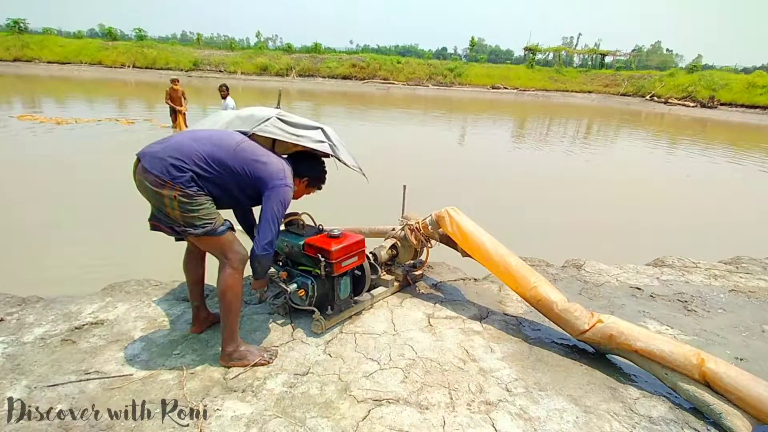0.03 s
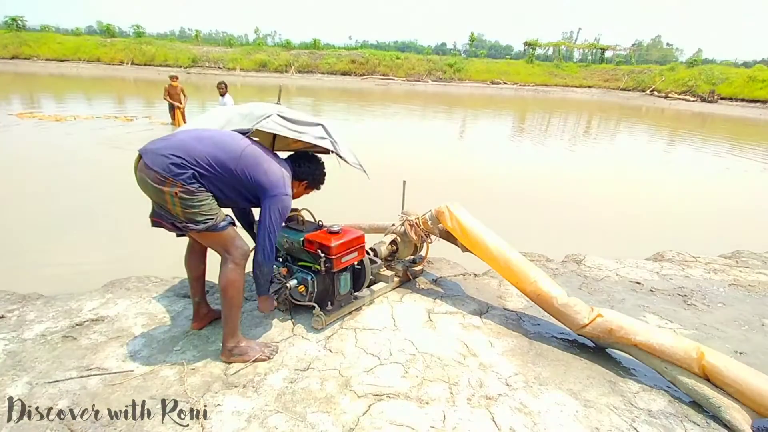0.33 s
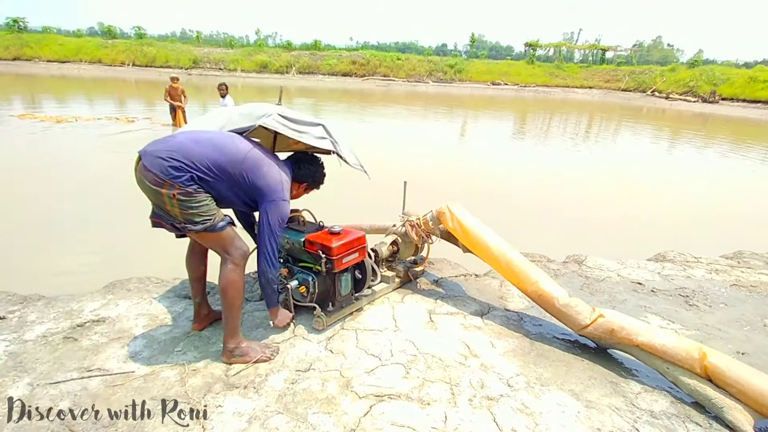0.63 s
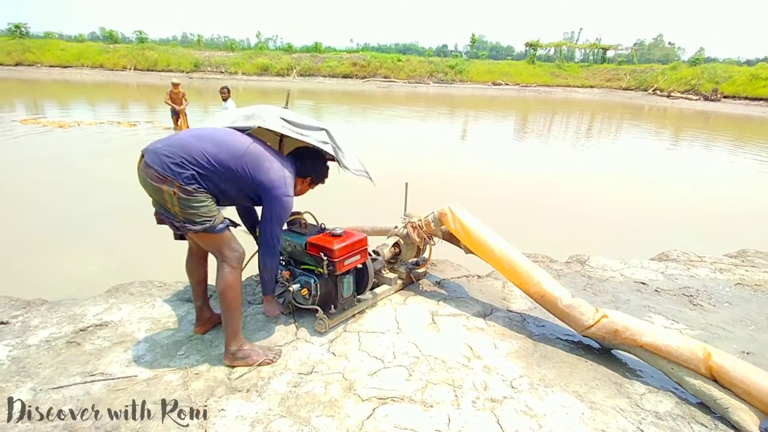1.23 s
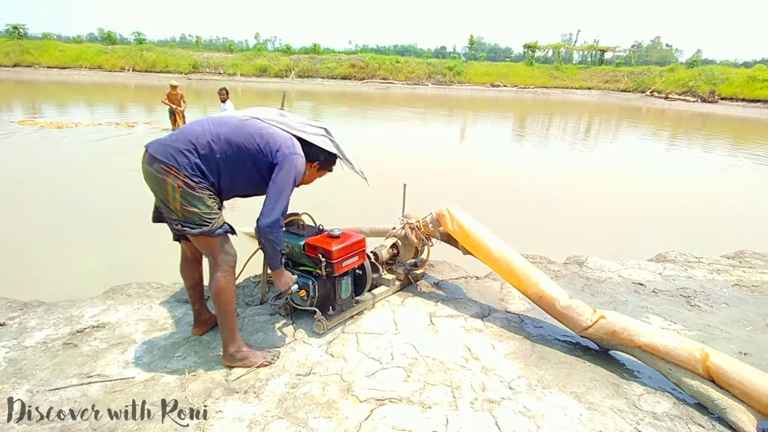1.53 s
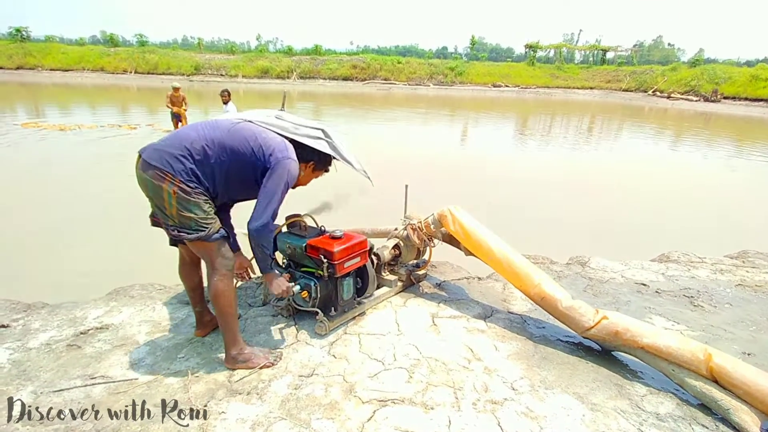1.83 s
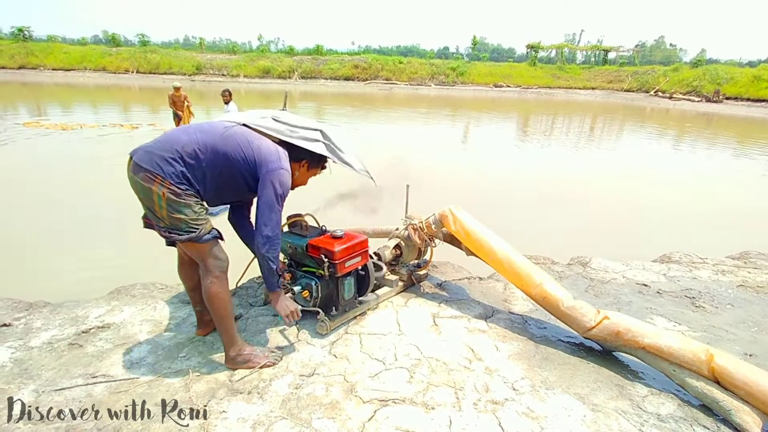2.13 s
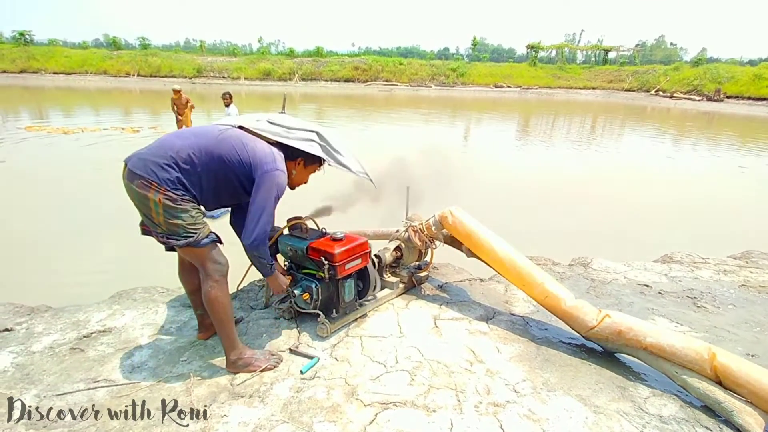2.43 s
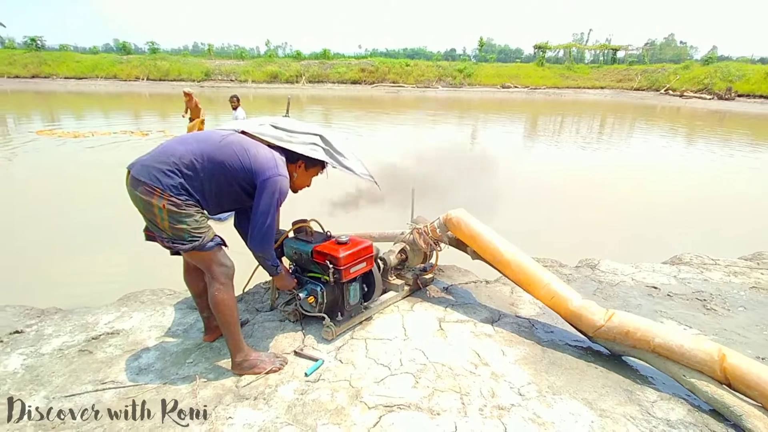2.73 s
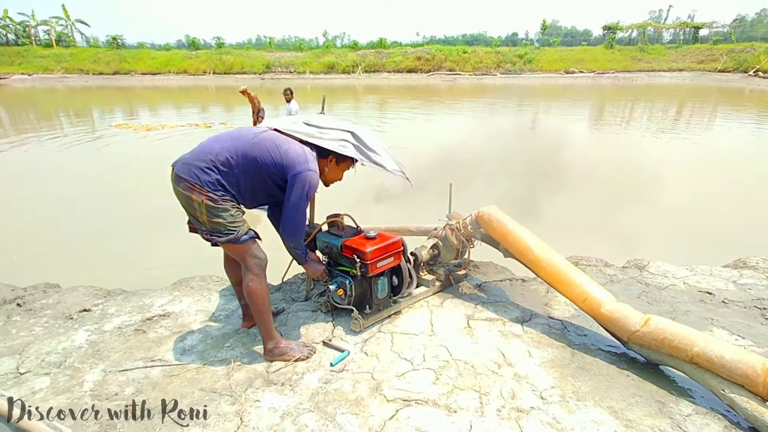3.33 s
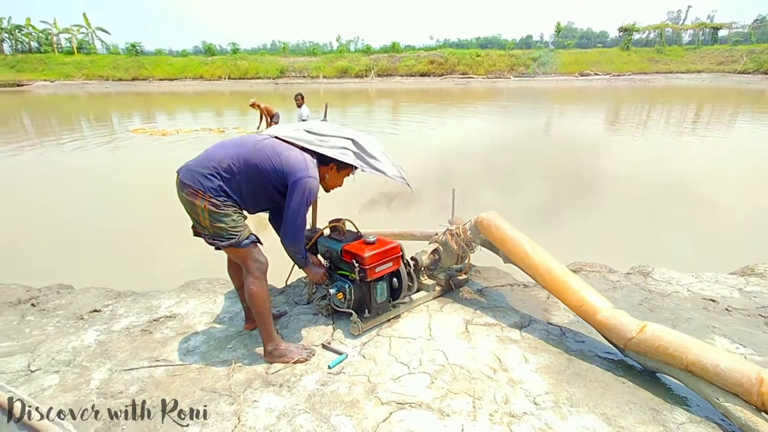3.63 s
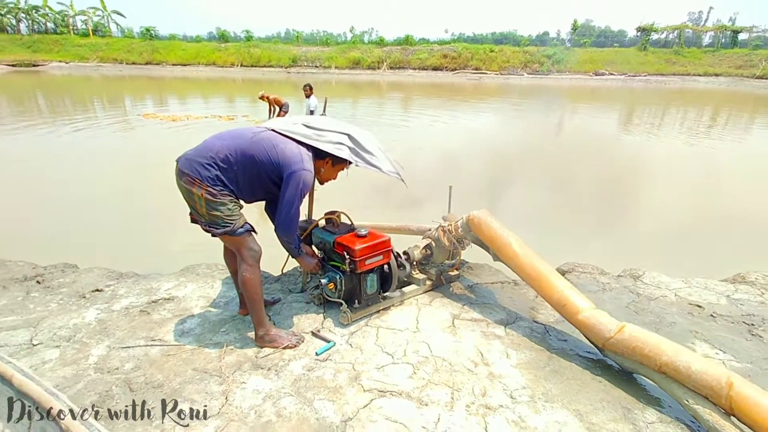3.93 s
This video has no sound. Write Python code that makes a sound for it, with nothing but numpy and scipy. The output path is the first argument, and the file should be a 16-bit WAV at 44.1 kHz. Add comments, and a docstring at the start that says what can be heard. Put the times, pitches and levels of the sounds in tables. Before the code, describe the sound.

A single-cylinder diesel pump engine starts up near the microphone, outdoors beside a pond. Cranking puffs and clanks give way to sharp firing knocks, then quick exhaust thumps and growing rattle. Another pump chugs softly in the distance.

```python
"""Diesel pump on a pond bank

Close to the microphone, on an open bank, a single-cylinder diesel on a water pump is hand-cranked,
catches and gathers speed. Cranking turns chuff and clack; then each cycle knocks, shakes the frame,
booms and rasps out of the exhaust and draws air again, while the rattle of gears and pump grows with
the speed. Far off over the water a second pump chugs."""
import sys
import numpy as np
from scipy import signal
from scipy.fft import rfft, irfft
from scipy.io import wavfile

SR = 44100
rng = np.random.default_rng(int(sys.argv[2]) if len(sys.argv) > 2 else 0)


def inscribe(sig):
    """Save sig as 16-bit PCM at rate SR to the path in sys.argv[1].

    A 1-D sig is mono; a 2-D sig holds one channel per row.
    Samples are clipped to [-1, 1] before scaling.
    """
    pcm = np.round(np.clip(np.atleast_2d(sig).T, -1, 1) * 32767)
    wavfile.write(sys.argv[1], SR, pcm.astype(np.int16))


N = 176400
T = np.arange(N) / SR

def undb(db):
    """Decibels to gain."""
    return 10 ** (np.asarray(db) / 20)

def add(out, start, sound):
    """Mix a sound in at a time in seconds."""
    i = int(np.clip(start * SR, 0, N))
    out[i:i + len(sound)] += sound[:N - i]

def envelope(shape):
    """Smooth rise, hold and exponential fall; every shape is (attack_s, hold_s, decay_s)."""
    attack, hold, decay = shape
    t = T[:SR // 5]
    rise = np.sin(np.pi / 2 * np.minimum(t / attack, 1)) ** 2
    return rise * np.exp(-np.maximum(t - attack - hold, 0) / decay)

def bursts(times, dbs, shape):
    """Gain curve of a series of bursts."""
    out, env = np.zeros(N), envelope(shape)
    for t, db in zip(times, dbs):
        add(out, t, undb(db) * env)
    return out

def strokes(t, db, shape):
    """Bursts, each led in by the swell of the compression."""
    return bursts(t, db, shape) + bursts(t - .0081, db - 18.5, shape=(.0069, .00075, .0014))

def grit(rough_db):
    """Noise broken into millisecond grains of uneven loudness."""
    x = rng.standard_normal(N) * undb(rough_db * np.repeat(rng.standard_normal(N // 42), 42))
    return x / x.std()

# Ringing of block and tank, over the plain response: pitch_hz, t60_s, level_db
BODY = [(487, 0.2, 2), (556, 0.14, -5.5), (843.4, 0.14, 2), (1080, 0.068, 8), (1270, 0.24, -3.5),
        (1555, 0.038, -3.5), (1907, 0.068, 1), (2550, 0.048, -6), (2768, 0.049, -2), (3190, 0.038, -7.5),
        (4330, 0.03, -27), (5700, 0.11, -16)]
def colour(x, spectrum, body=1):
    """Causal filter of unit power, with a share of the ringing of the engine body."""
    size = 16384
    f = np.arange(size // 2 + 1) * SR / size
    hz, db = np.array(spectrum).T
    gain = undb(np.interp(np.log(f + 1), np.log(hz), db))
    cepstrum = irfft(np.log(gain))
    cepstrum[1:size // 2] *= 2  # fold to minimum phase
    cepstrum[size // 2 + 1:] = 0
    ringing = sum(undb(g) / (1 + 2j * np.pi * (f - pitch) * t60 / np.log(1000)) for pitch, t60, g in BODY)
    impulse = irfft(np.exp(rfft(cepstrum)) * (1 + body * ringing))
    return signal.fftconvolve(x, impulse / np.linalg.norm(impulse))[:N]

def boom(hz, db, shape, sag_per_s=0):
    """A few swings of a low resonance; the pitch may sag, passing hz at the end of the attack."""
    env = envelope(shape)
    pitch = hz * np.exp(-sag_per_s * (T[:len(env)] - shape[0]))
    return -undb(db) * env * np.sin(2 * np.pi * np.cumsum(pitch) / SR)

def mode(hz, t60, db, age):
    """One dying vibration of struck metal."""
    return undb(db) * np.sin(2 * np.pi * hz * age) * np.exp(-np.log(1000) * age / t60)

def ring(modes, starts, dbs, detune):
    """Modes struck at given times, slightly detuned on each blow."""
    out, age, contact_s = np.zeros(N), T[:SR // 2], .003
    for start, blow_db in zip(starts, dbs):
        tone = sum(mode(hz * rng.normal(1, detune), t60, db, age) for hz, t60, db in modes)
        add(out, start, undb(blow_db) * tone * (1 - np.exp(-age / contact_s)))
    return out

def cycles(rows):
    """Start and length of each engine cycle, in seconds."""
    t = np.array([row[0] for row in rows])
    return t, np.append(np.diff(t), t[-1] - t[-2])

# Air over the pond: frequency_hz, level_db
AIR_SPECTRUM = [(25, -14), (60, 7), (150, 29.5), (500, 23), (1500, 7), (3200, -40), (4500, -42),
                (8000, -23), (16000, -30)]
def open_air():
    """A quiet, low wash of air at the microphone."""
    return undb(-47.5) * colour(rng.standard_normal(N), AIR_SPECTRUM, body=0)

# Gear and pump rattle, and the fine sizzle of spinning parts, close by: time_s, level_db
RATTLE_LEVEL = [(0, -48), (.3, -53.5), (.7, -46.5), (1.0, -55), (1.3, -39), (1.5, -45.5), (1.75, -41.5),
                (2.1, -38), (2.5, -34.5), (3.0, -33), (3.4, -34), (3.7, -30), (4.0, -32.5)]
SIZZLE_LEVEL = [(0, -70), (1.1, -74), (1.32, -51), (1.5, -80), (1.9, -57), (2.4, -48.5), (3.0, -46),
                (4.0, -42.5)]
# Their tone: frequency_hz, level_db
RATTLE_SPECTRUM = [(30, -56), (60, -44), (120, 2.5), (230, 5.5), (390, -4), (520, -1.5), (750, -4.5),
                   (1100, -2), (2000, -6), (3200, -11.5), (4200, -24.5), (6000, -29), (8200, -25),
                   (10700, -33), (16000, -38)]
SIZZLE_SPECTRUM = [(200, -30), (3000, -39), (4600, -2), (6200, -13), (8200, 6), (10500, -14), (13700, 6.5),
                   (15800, 6.5)]
SLAP_TURNS, SLAP_DB = (.015, .225, .485, .775), (-4.5, -5.5, 4, -4)  # cycle shares; dB over the rattle
def machinery():
    """Gears and pump rattle with the speed; the piston slaps at each dead centre, four times a cycle."""
    t, cycle = cycles(CHUFFS[:-1] + FIRINGS)  # the last chuff is also the first firing
    env = undb(rattle_db(T) - 2)
    for turn, db in zip(SLAP_TURNS, SLAP_DB):
        when = t + turn * cycle
        env = np.hypot(env, bursts(when, rattle_db(when) + db, shape=(.0014, .0091, .0045)))
    sizzle_gain = undb(np.interp(T, *np.array(SIZZLE_LEVEL).T) - rattle_db(T))
    sizzle = colour(grit(rough_db=2) * env * sizzle_gain, SIZZLE_SPECTRUM, body=0)
    return sizzle + colour(grit(rough_db=3) * env, RATTLE_SPECTRUM, body=.45)

def rattle_db(when):
    """Level of the rattle at a time."""
    return np.interp(when, *np.array(RATTLE_LEVEL).T)

# Compressions blown off while cranking: start_s, level_db, hiss_db
CHUFFS = [(.048, -25, -32), (.253, -24, -59), (0.435, -22, -32.5), (0.605, -22, -89.5), (0.76, -22, -34.5),
          (0.907, -22.5, -41), (1.047, -22, -36), (1.182, -22, -60), (1.312, -20.5, -33)]
# Tone of the escaping air: frequency_hz, level_db
CHUFF_SPECTRUM = [(40, -19), (90, -8.5), (190, 3.5), (300, 3.5), (600, -3.5), (1100, -4), (1700, -0.5),
                  (2200, -9), (3000, -5), (4000, -16), (6000, -32), (8500, -26), (11000, -34.5),
                  (16000, -45)]
HISS_SPECTRUM = [(100, -55), (4000, -15), (8000, -9), (12000, -16), (15500, 1)]
# Free ring of crank and flywheel, relative to the chuff: pitch_hz, t60_s, level_db
CRANK_MODES = [(486.4, 0.5, -13), (862, 0.18, -8.5), (1008, 0.91, -17), (1072, 0.11, -2.5),
               (1597, 0.081, -13), (1970, 0.2, -16), (2455, 0.044, -1), (2810, 0.041, -3.5),
               (4390, 0.043, -14.5)]
def cranking():
    """Compressed air chuffs and hisses out on each cranked cycle; crank and flywheel ring."""
    t, db, hiss_db = np.array(CHUFFS).T
    shape = (.0033, .012, .0044)
    chuff = colour(grit(rough_db=2.5) * strokes(t, db, shape), CHUFF_SPECTRUM)
    crank = ring(CRANK_MODES, t + .002997, db, detune=.013)
    hiss = colour(grit(rough_db=3) * bursts(t, hiss_db, shape), HISS_SPECTRUM, body=0)
    return chuff + crank + hiss

def far_pump():
    """Soft, even exhaust beats from far over the water."""
    out, period_s = np.zeros(N), .0817
    for when in np.arange(.0605, T[-1], period_s):
        add(out, when, boom(hz=160.5, db=-35, shape=(.007, .0032, .0044)))
    return out

PUFF_SHAPE = (.0031, .0052, .0022)
def intake():
    """The intake gulps three quarters through each cycle, louder as the rattle rises."""
    out = np.zeros(N)
    t, cycle = cycles(CHUFFS[:-1] + FIRINGS)
    for when in t + .75 * cycle:
        db = -23 + 1.17 * (rattle_db(when) - rattle_db(T[-1]))
        add(out, when, boom(hz=139, db=db, shape=PUFF_SHAPE))
    return out

# Clacks of valve gear and piston: start_s, level_db
CLACKS = [(0.353, -33), (.487, -39.5), (0.692, -31), (.712, -39.5), (.761, -27.5), (.827, -44),
          (0.986, -27.5), (1.008, -38), (1.049, -24.5), (1.183, -26), (1.255, -28.5), (1.334, -25.5),
          (1.366, -26.5), (1.442, -37), (1.662, -39.5), (1.687, -38.5), (1.862, -33), (2.321, -29.5),
          (2.342, -32), (3.258, -27), (3.736, -24.5), (3.826, -23)]
# Their tone: frequency_hz, level_db
CLACK_SPECTRUM = [(60, -8), (300, -13), (1000, 8), (2000, 6), (3200, 7), (4500, -3), (7500, -10),
                  (10500, -14), (16000, -20)]
def clacks():
    """Valve gear and piston strike sharply and ring the block."""
    env = bursts(*np.array(CLACKS).T, shape=(.00067, .0053, .0041))
    return colour(grit(rough_db=3) * env, CLACK_SPECTRUM)

# Firings of the near engine: start_s, knock_db, exhaust_opens_s, boom_hz, boom_db, rasp_db, puff_db
FIRINGS = [(1.313, -24.5, 1.381, 187.3, -21, -29.5, -51), (1.576, -17, 1.630, 184, -21.5, -27.5, -29),
           (1.791, -15, 1.836, 182, -19.5, -28.5, -55), (1.974, -13.5, 2.013, 183, -18.5, -27, -47),
           (2.134, -13, 2.161, 153.5, -24, -24.5, -33), (2.275, -16.5, 2.301, 138, -26, -22.5, -27),
           (2.408, -19.5, 2.429, 143, -21, -22.5, -55.5), (2.525, -18, 2.547, 133, -21.5, -23, -39),
           (2.638, -18.5, 2.659, 131, -21.5, -22.5, -27), (2.748, -16, 2.765, 127, -20.5, -21.5, -48),
           (2.848, -19.5, 2.865, 129, -19, -23, -29), (2.946, -27, 2.970, 138, -18.5, -30.5, -20),
           (3.045, -28, 3.071, 139, -20, -31, -16.5), (3.150, -27, 3.177, 138, -22, -28, -19.5),
           (3.258, -16, 3.279, 128, -20, -21.5, -42), (3.362, -21, 3.382, 122, -20, -22.5, -24.5),
           (3.464, -21.5, 3.480, 126, -19, -19.5, -39), (3.56, -22, 3.574, 126, -19, -21.5, -28),
           (3.648, -17.5, 3.666, 130, -17.5, -23, -30), (3.738, -15.5, 3.759, 137, -15, -28, -30),
           (3.826, -18.5, 3.849, 128, -18.5, -29.5, -16), (3.918, -32, 3.944, 141, -19, -28.5, -17)]
# Ring of the cylinder under a knock: pitch_hz, t60_s, level_db
CYLINDER_MODES = [(523, 0.21, -17.5), (1070, 0.027, 2.5), (1122, 0.026, 7), (1335, 0.035, 3),
                  (2635, 0.013, 0), (3440, 0.011, -9.5)]
# Tone of the crack: frequency_hz, level_db
KNOCK_SPECTRUM = [(40, -60), (120, -27), (280, 8.5), (700, -0.5), (1150, 6.5), (1900, -8), (3500, -3.5),
                  (4300, -13), (6500, -21.5), (8500, -19.5), (11000, -26), (16000, -13)]
def knocks():
    """Each ignition cracks, rings the cylinder and sets the frame shaking."""
    t, db = np.array(FIRINGS)[:, :2].T
    cylinder = ring(CYLINDER_MODES, t, db - 2, detune=.032)
    shake = np.zeros(N)
    for start, knock_db in zip(t, db):
        add(shake, start, boom(hz=190.8, db=knock_db - 8, shape=(.026, .01, .01)))
    crack_db = -23.5 + .77 * (db - db.mean())
    crack = grit(rough_db=3.5) * strokes(t, crack_db, shape=(.00092, .0019, .011))
    return cylinder + shake + colour(crack, KNOCK_SPECTRUM)

# Loose sheet-metal parts, relative to the rattle: pitch_hz, t60_s, level_db
LOOSE_PARTS = [(2080, 0.018, 2), (2850, 0.02, 1), (3280, 0.022, 3.5), (4570, 0.011, -11),
               (7970, 0.011, -10.5), (8750, 0.013, -5.5), (13700, 0.014, -5), (15000, 0.013, -18)]
def clinks():
    """Each piston slap of the running engine sets loose parts clinking."""
    out, age, spread_s = np.zeros(N), T[:SR // 20], .009
    t, cycle = cycles(FIRINGS)
    slaps = (t + np.outer(SLAP_TURNS, cycle)).ravel()
    for hz, t60, db in LOOSE_PARTS:
        for when in slaps + spread_s * rng.random(len(slaps)):
            level_db = rattle_db(when) + db + rng.normal(0, 2.3)
            add(out, when, mode(hz * rng.normal(1, .027), t60, level_db, age))
    return out

# Squeaks at the exhaust joint: start_s, pitch_hz, level_db
SQUEAKS = [(1.335, 6450, -26.5), (1.628, 7200, -37), (1.833, 7120, -34.5), (2.012, 6400, -37),
           (2.167, 7320, -33), (2.288, 6330, -33.5), (2.307, 6750, -31), (2.553, 6800, -36.5),
           (2.668, 7420, -38), (2.871, 7700, -36), (3.148, 8170, -38), (3.285, 7160, -36),
           (3.387, 7600, -38), (3.484, 7700, -42), (3.58, 7600, -34), (3.671, 7300, -37)]
def squeaks():
    """Gas forced through the exhaust joint gives short, breathy, rising whistles."""
    out, env = np.zeros(N), envelope((.0028, .0018, .0079))[:SR // 25]
    flutter_hz, rise_per_s = 760, 12
    narrow = signal.butter(2, flutter_hz, fs=SR, output="sos")
    for t, hz, db in SQUEAKS:
        flutter = signal.sosfilt(narrow, rng.standard_normal(len(env)))
        phase = 2 * np.pi * np.cumsum(hz * (1 + rise_per_s * T[:len(env)])) / SR
        add(out, t, undb(db) * env * flutter / flutter.std() * np.sin(phase))
    return out

# Tone of the exhaust rasp: frequency_hz, level_db
RASP_SPECTRUM = [(40, -36), (120, -3), (250, 8.5), (390, 0.5), (600, 7), (850, -5.5), (1400, -2),
                 (2300, -4.5), (3300, -9.5), (4200, -13), (5700, -15.5), (7800, -16.5), (10500, -22.5),
                 (13500, -22.5), (16000, -17)]
def exhaust():
    """The valve opens with a boom and a rasp; the rising piston pushes out a second puff mid-cycle."""
    opens, hz, boom_db, rasp_db, puff_db = np.array(FIRINGS)[:, 2:].T
    t, cycle = cycles(FIRINGS)
    out = np.zeros(N)
    for k in range(len(t)):
        add(out, opens[k], boom(hz[k], boom_db[k], shape=(.0022, .067 * cycle[k], .0058), sag_per_s=7.6))
        add(out, t[k] + .49 * cycle[k], boom(hz=177.4, db=puff_db[k], shape=PUFF_SHAPE))
    rasp = grit(rough_db=.5) * bursts(opens, rasp_db, shape=(.0025, .0033, .012))
    return out + colour(rasp, RASP_SPECTRUM)

def scene():
    """The near engine, a short scatter off the bank, the far pump and air; only the treble has width."""
    engine = machinery() + cranking() + intake() + clacks() + knocks() + clinks() + squeaks() + exhaust()
    decay_s = np.array([[.017], [.004]])  # bank scatter, stereo spread
    tails = rng.standard_normal((2, SR // 4)) * np.exp(-T[:SR // 4] / decay_s)
    scatter, spread = (signal.fftconvolve(engine, h / np.linalg.norm(h))[:N] for h in tails)
    mid = engine + undb(-7.5) * scatter + far_pump() + open_air()
    side = undb(-13) * signal.sosfilt(signal.butter(6, 5500, "high", fs=SR, output="sos"), spread)
    return np.array([mid + side, mid - side])

def record(dry):
    """The microphone on the bank thins the bass and cuts the top."""
    low_cut_hz, top_hz = 65, 15900
    thin = signal.sosfilt(signal.butter(2, low_cut_hz, "high", fs=SR, output="sos"), dry)
    return signal.sosfilt(signal.ellip(10, .2, 70, top_hz, fs=SR, output="sos"), thin)

dry = scene()
out = record(dry)
inscribe(out)
```